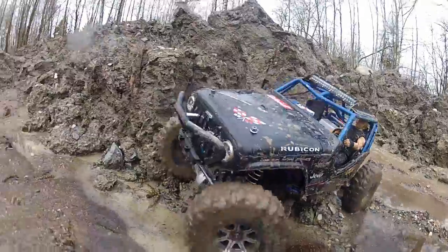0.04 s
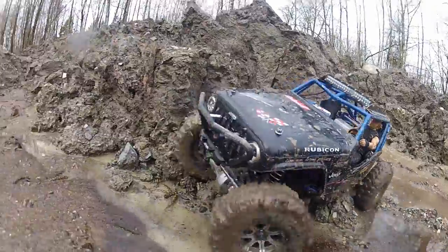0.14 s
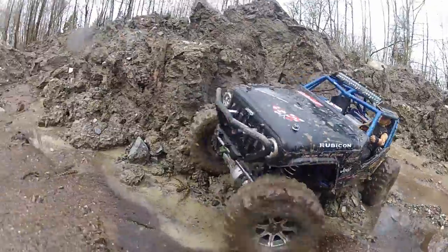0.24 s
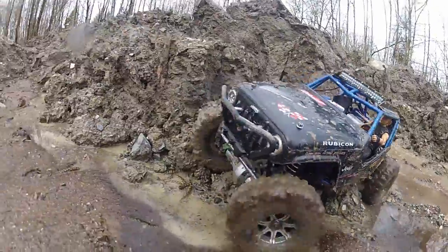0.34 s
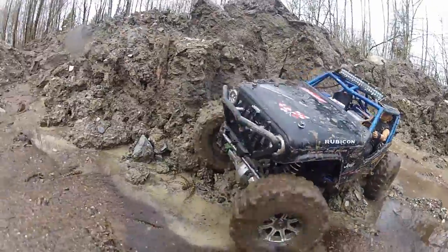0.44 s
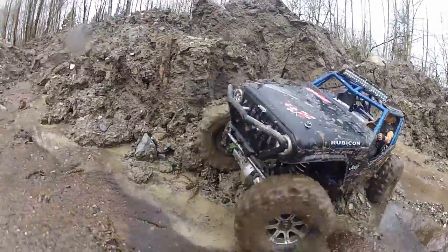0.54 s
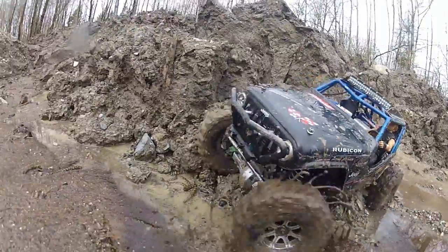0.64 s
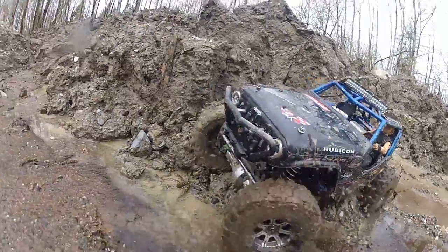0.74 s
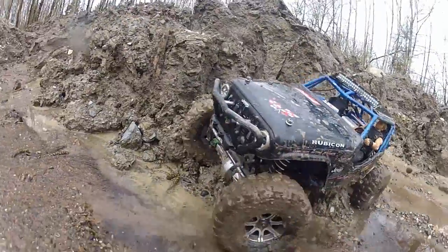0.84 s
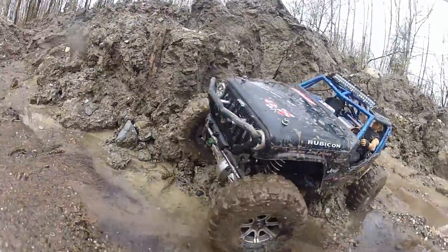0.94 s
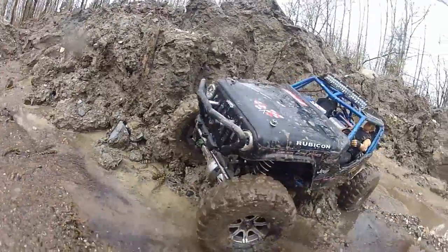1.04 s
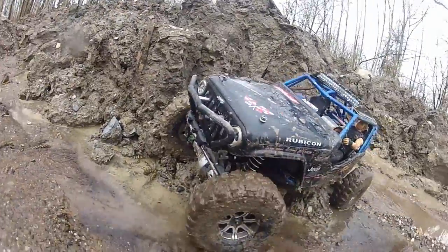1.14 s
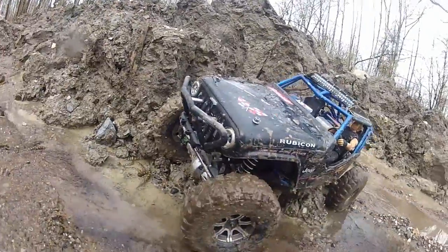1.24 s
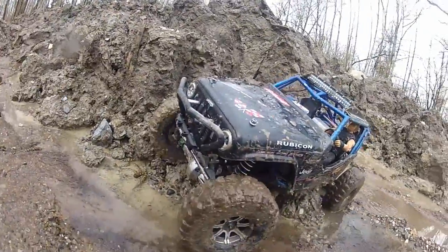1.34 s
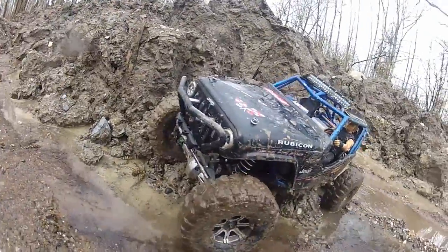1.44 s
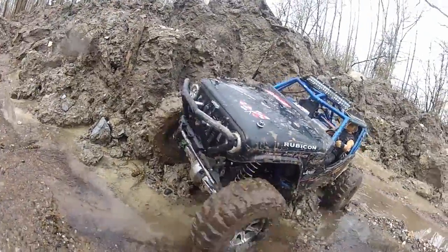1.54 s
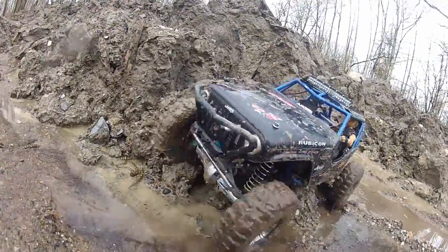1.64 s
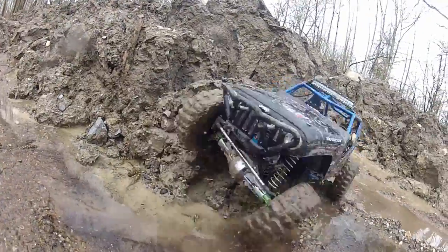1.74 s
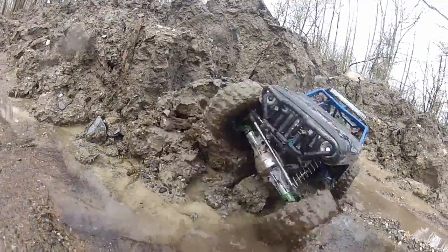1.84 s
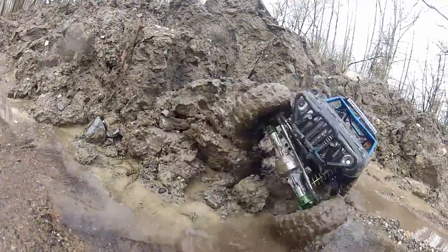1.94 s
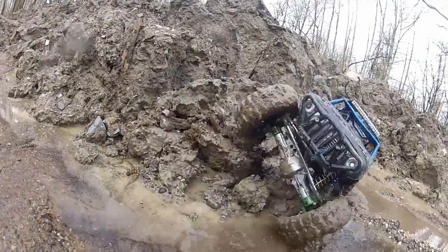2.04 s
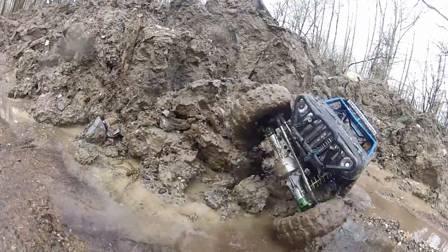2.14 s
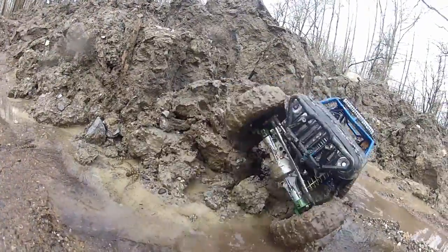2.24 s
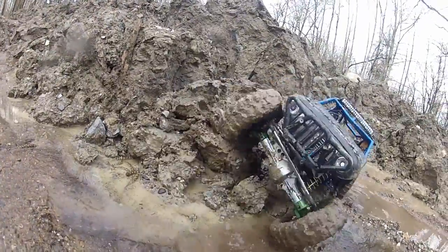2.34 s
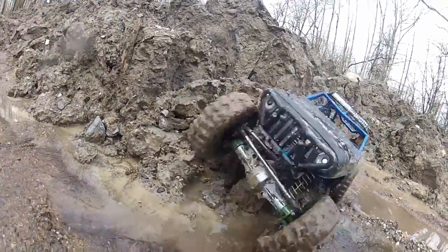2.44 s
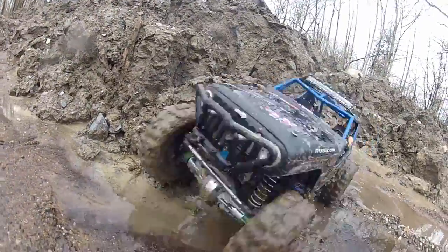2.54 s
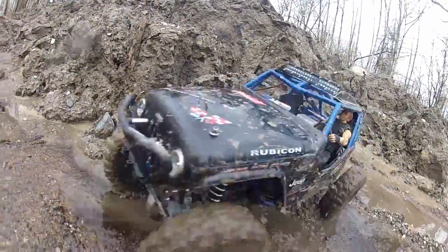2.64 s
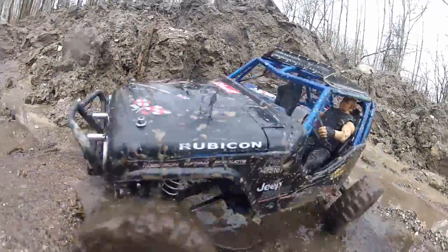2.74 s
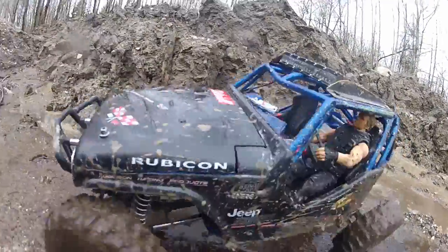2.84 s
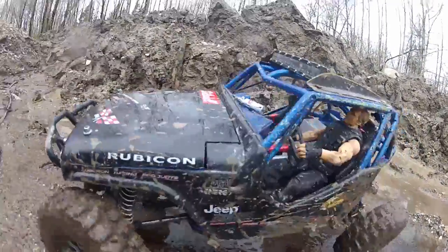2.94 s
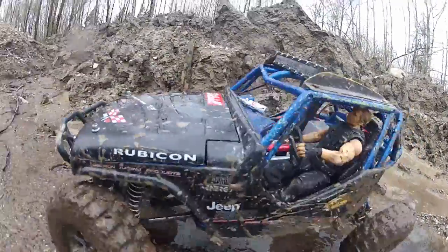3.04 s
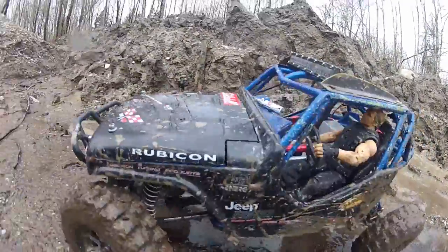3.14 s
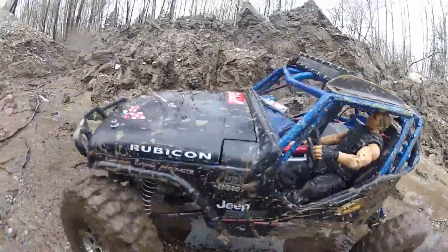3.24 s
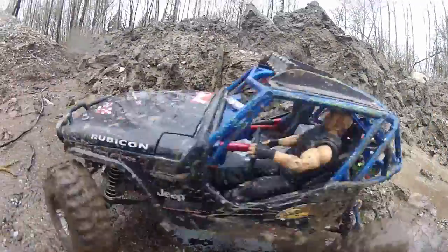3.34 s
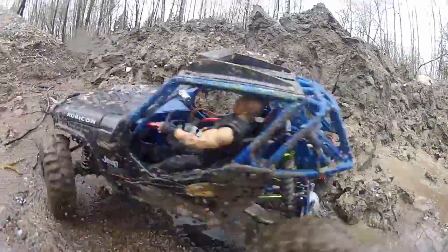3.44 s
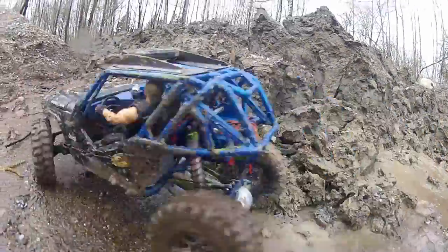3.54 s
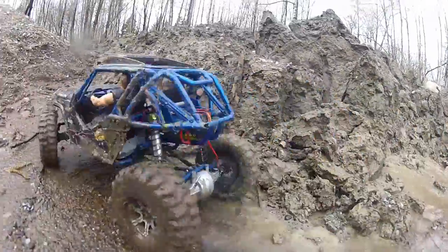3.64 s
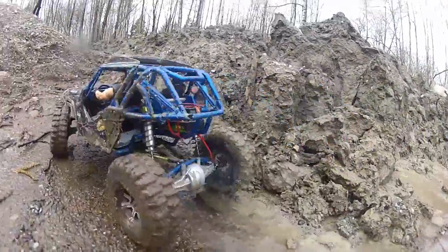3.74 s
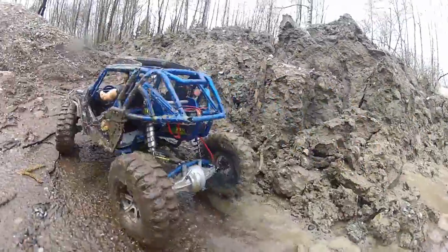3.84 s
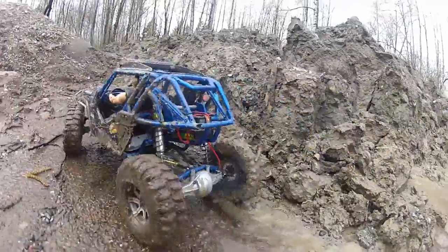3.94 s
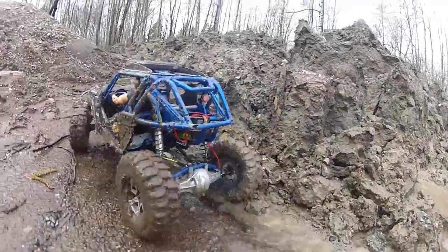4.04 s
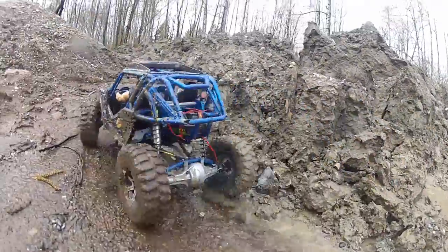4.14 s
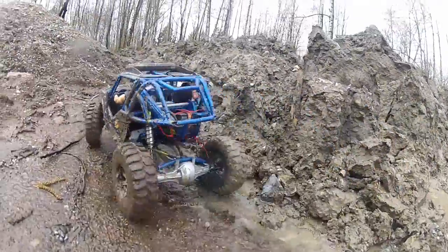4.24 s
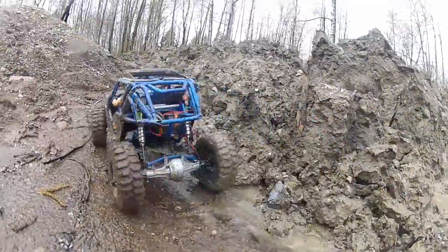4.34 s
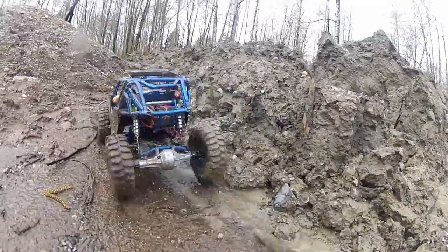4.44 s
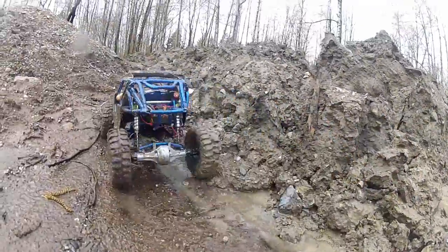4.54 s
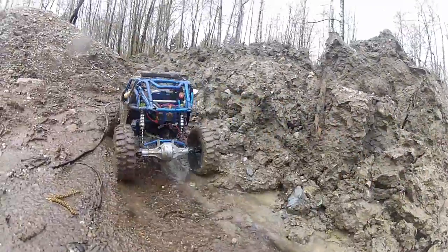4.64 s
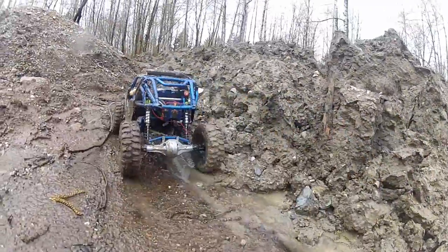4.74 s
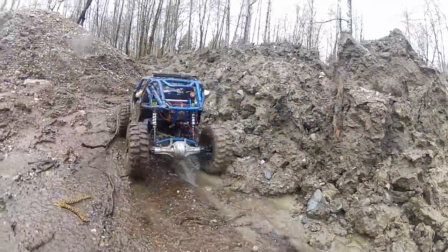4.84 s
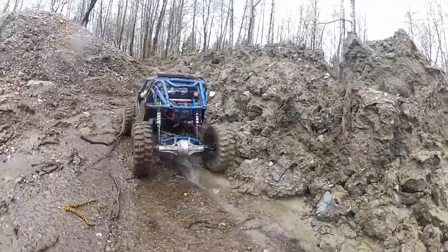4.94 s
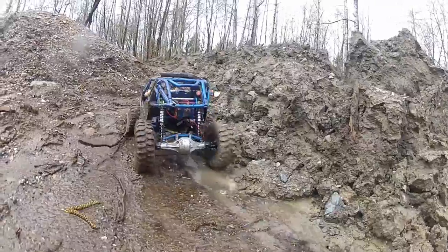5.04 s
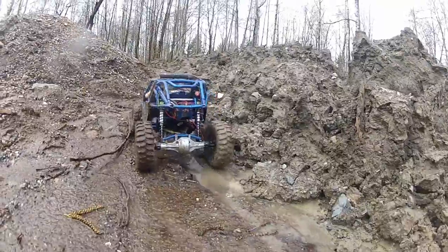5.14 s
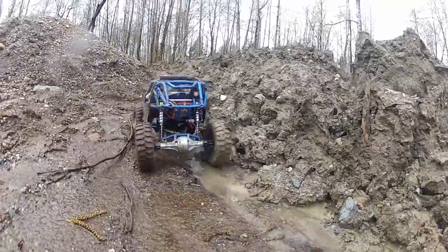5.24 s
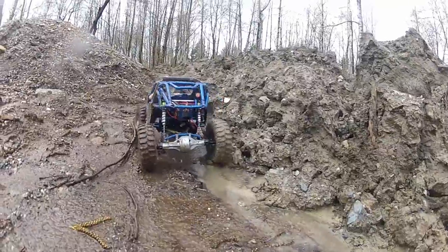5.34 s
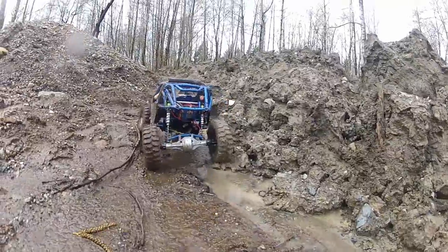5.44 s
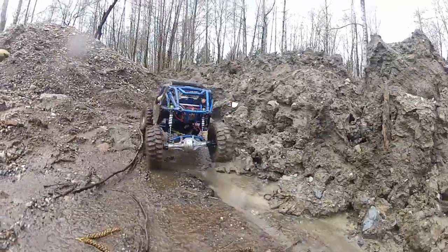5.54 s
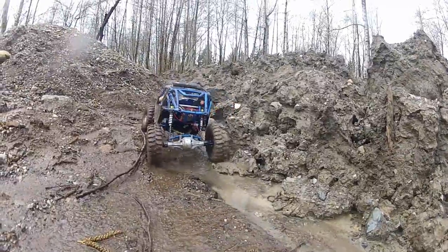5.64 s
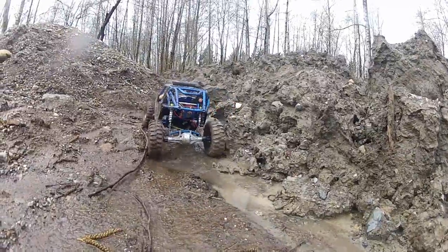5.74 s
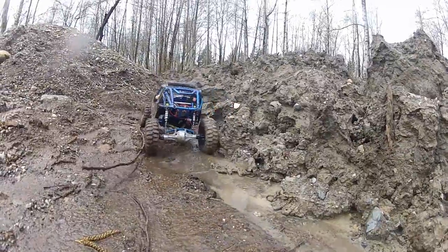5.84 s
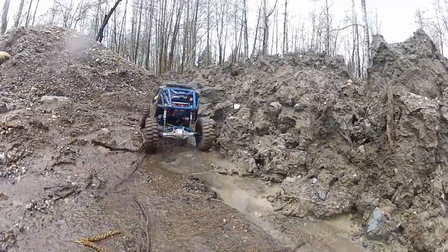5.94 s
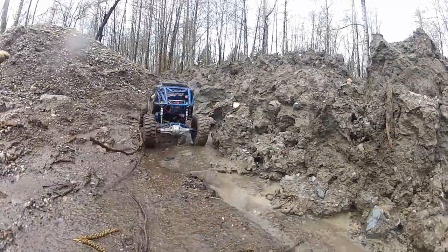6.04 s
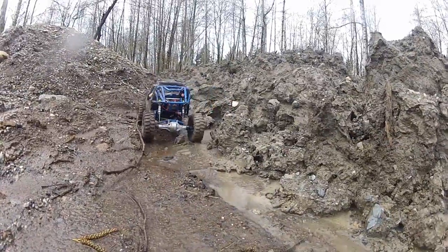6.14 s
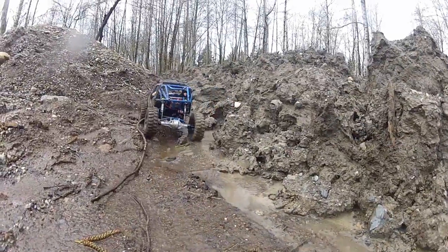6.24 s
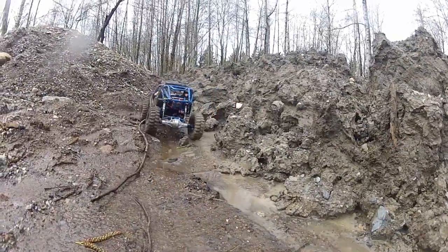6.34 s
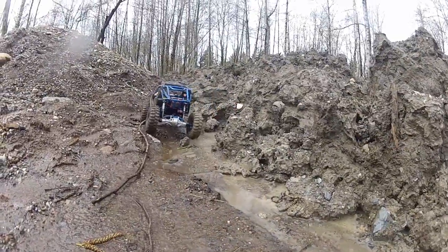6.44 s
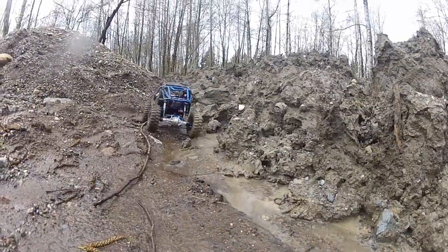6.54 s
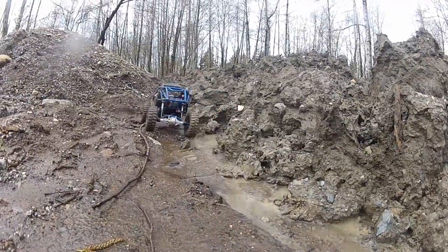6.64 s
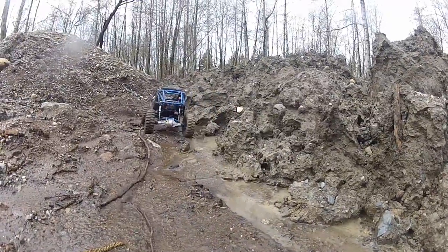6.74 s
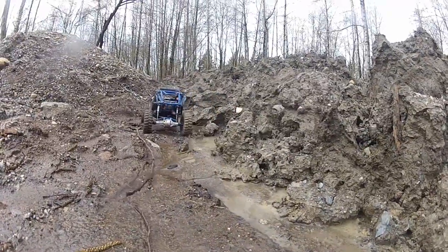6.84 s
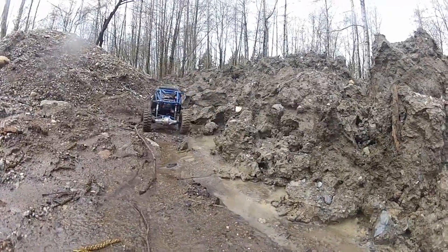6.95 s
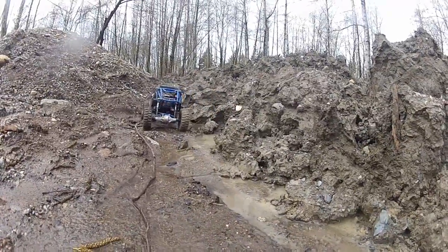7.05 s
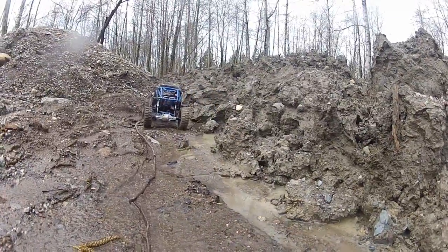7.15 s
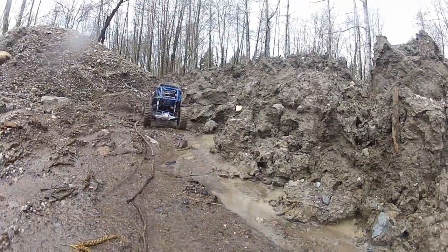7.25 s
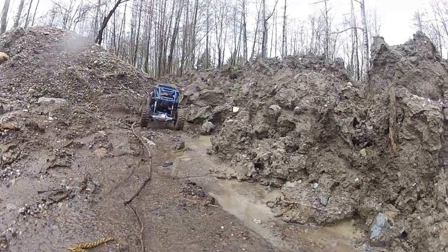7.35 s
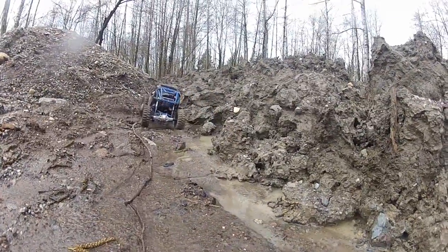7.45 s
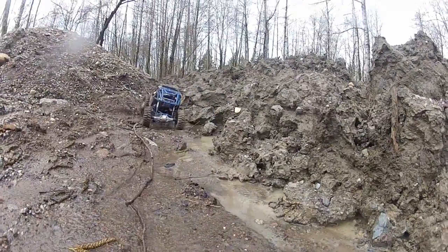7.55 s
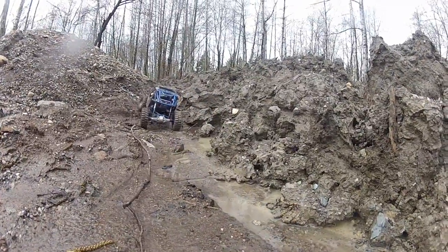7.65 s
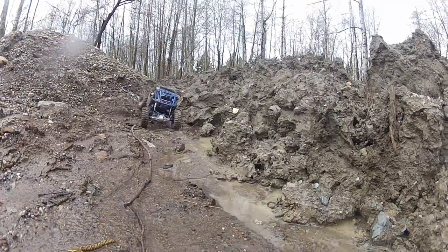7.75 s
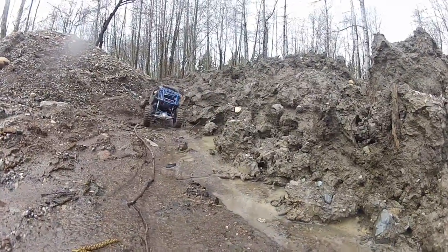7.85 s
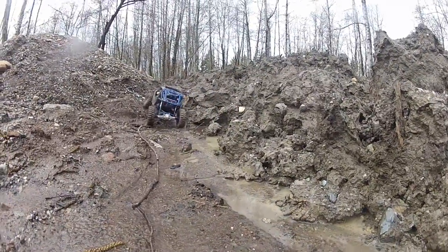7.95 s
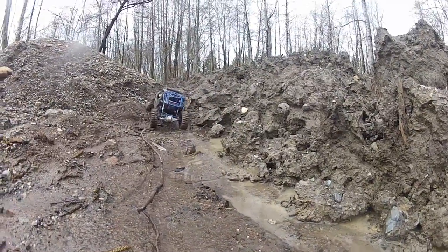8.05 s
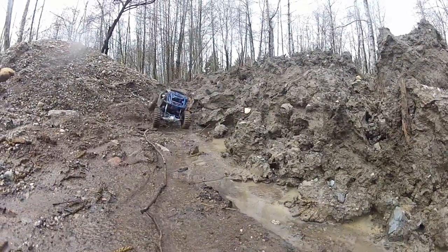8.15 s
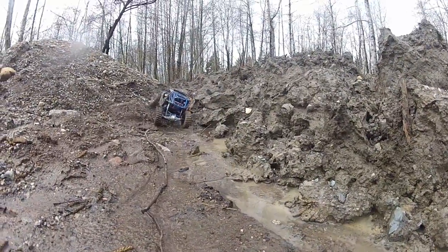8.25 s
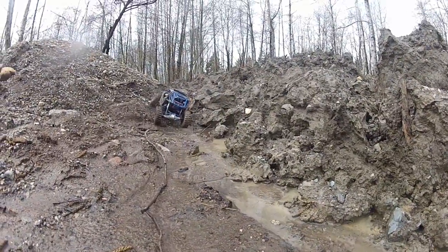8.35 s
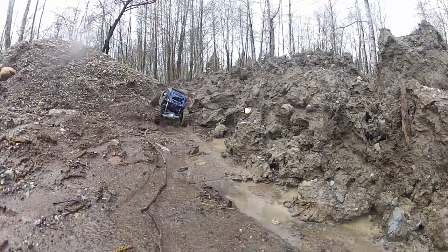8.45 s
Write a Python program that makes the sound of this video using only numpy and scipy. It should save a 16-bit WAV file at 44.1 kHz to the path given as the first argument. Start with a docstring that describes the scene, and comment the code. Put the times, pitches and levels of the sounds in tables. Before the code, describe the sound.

A toy off-road truck revs its electric motor in raspy spurts, knocks once, spatters through wet mud and whirs into the distance.

```python
"""Small gears whine and rasp in bursts as a radio-controlled crawler backs off a mud bank, turns close to a
hand-held camera and drives away through wet ruts. The pitch is the rate at which the teeth mesh; load
roughens it to a rasp. The steering servo ticks, the tyres crackle and fling mud, and far off the motor
warbles. Over a low outdoor rumble, knocks and soft bumps reach the camera's closed housing. Fixed
resonances colour most of the sound."""
import sys
import numpy as np
from scipy import signal
from scipy.fft import rfft, irfft
from scipy.io import wavfile
from scipy.ndimage import uniform_filter1d

SR = 44100
rng = np.random.default_rng(int(sys.argv[2]) if len(sys.argv) > 2 else 0)


def inscribe(sig):
    """Save sig as 16-bit PCM at rate SR to the path in sys.argv[1].

    A 1-D sig is mono; a 2-D sig holds one channel per row.
    Samples are clipped to [-1, 1] before scaling.
    """
    pcm = np.round(np.clip(np.atleast_2d(sig).T, -1, 1) * 32767)
    wavfile.write(sys.argv[1], SR, pcm.astype(np.int16))


N = 373968
TIME = np.arange(N) / SR

# Spectra of tooth rattle, whine from the front and from behind, outdoor air, a knock, loose parts,
# rubbing and spray. Each row: frequency in Hz, relative level in dB.
RATTLE_SPECTRUM = [(300, -15), (600, -2.5), (850, -6), (1300, 2), (2200, 0.5), (3200, -0.5), (3900, -10.5),
                   (4500, -14), (7200, -12.5), (8400, -11), (10300, 0), (14500, -13)]
FRONT_WHINE_SPECTRUM = [(300, -10), (600, -2), (800, 0.5), (1020, -3), (1250, 2.5), (1500, -0.5), (1950, 2),
                        (2300, 1.5), (2600, -12), (2950, -7), (3300, 3), (3800, -4), (4500, -19)]
REAR_WHINE_SPECTRUM = [(300, -20), (600, -3), (800, -5.5), (1020, 1), (1250, -2), (1500, -1), (1950, 0.5),
                       (2300, -9), (2600, -6), (2950, 7), (3300, 7), (3800, 3.5), (4500, -21)]
AIR_SPECTRUM = [(20, -2.5), (45, -1), (100, -4.5), (220, -7.5), (330, -8), (550, -15.5), (900, -20.5),
                (1600, -24), (3000, -31), (5000, -29.5), (10000, -37), (14500, -44)]
KNOCK_SPECTRUM = [(150, -17), (300, -3), (450, -3), (750, -9), (1300, -4.5), (1800, 3.5), (2300, -11),
                  (2900, -4), (3700, -6.5), (4500, -27), (8500, -17.5), (14500, -23)]
CLATTER_SPECTRUM = [(200, 3.5), (800, -22), (1250, 9), (1700, -7), (2350, 0.5), (3000, -14), (3600, -6),
                    (5000, -13), (9500, -14.5), (14500, -14)]
RUB_SPECTRUM = [(40, -5.5), (220, -3.5), (300, -11), (700, -34)]
SPRAY_SPECTRUM = [(1000, -26), (2800, 0.5), (3700, 6.5), (4500, -5), (6000, -11), (8400, 0.5),
                  (10300, -23), (14500, -6)]
# Resonances that colour the sound, with two dips and a deep gap in the treble near 12 kHz.
# Each row: centre in Hz, width in Hz, gain in dB.
PEAKS_AND_DIPS = [(1315, 31, 6.5), (1490, 46, 8.5), (1917, 37, 9), (2350, 490, 5.5), (2882, 293, 11),
                  (3696, 520, 8.5), (6050, 690, -4.5), (7500, 220, -10), (8350, 390, 9.5), (9130, 260, 11),
                  (9780, 600, 5), (11956, 1150, -93), (13800, 180, 10.5)]
# Resonances of the open chassis and the servo. Each row: centre in Hz, width in Hz, gain in dB.
CHASSIS_MODES = [(1210, 110, 1), (1520, 210, 3.2), (1750, 98, 2.2), (1884, 130, 5.3), (2870, 470, 4.6),
                 (3610, 430, 4.2)]
SERVO_MODES = [(2918, 380, 1), (9030, 300, -9.5), (9700, 220, -16)]

# One curve per push of the throttle. Each row: time in seconds, tooth-mesh rate in Hz, load in dB.
THROTTLE_PUSHES = [
    [(-.02, 878, 1), (.07, 830, 3), (.15, 700, 4), (.25, 790, 2.5), (.38, 810, 4), (.42, 790, 5),
     (.48, 1157, 2), (.53, 1120, 5), (.61, 1595, 4.5), (.645, 2297, 1.5), (.72, 2290, 8), (.745, 2830, 12),
     (.84, 2880, 8.5), (.875, 2200, 4), (.94, 599.3, 11.5)],
    [(1.28, 429, 2), (1.65, 694, 6), (1.8, 751, 7), (1.97, 674, 13), (2.04, 394, 7)],
    [(2.39, 798, 12), (2.44, 1488, 8.5), (2.485, 1062, 3), (2.52, 1397, 3.5), (2.565, 1166, 0.5),
     (2.62, 1626, 3), (2.655, 1449, -4.5), (2.665, 2278, -1), (2.688, 2250, -3), (2.705, 1890, 0),
     (2.738, 2198, 4), (2.76, 1783, -1), (2.796, 1791, 8), (2.82, 1152, -5.5), (2.865, 1477, -1),
     (2.9, 1130, -1), (2.98, 580.3, 7), (3.09, 543, 4), (3.18, 326, 18)],
    [(3.19, 281, 0), (3.24, 399.5, 10), (3.31, 801, 7.5), (3.39, 900, 9), (3.45, 1620, 0), (3.49, 1316, 0),
     (3.52, 2062, 0.5), (3.55, 1760, -1), (3.575, 2288, 9.5), (3.605, 1890, -5.5), (3.645, 1902, -4.5),
     (3.68, 1194, 0.5), (3.72, 898, 4.5), (3.755, 1250, -0.5), (3.8, 754, -6.5), (3.96, 713, -1)],
    [(3.89, 720, 0), (4.03, 723, -0.5), (4.22, 753, -3.5), (4.36, 827, 1), (4.63, 821, -3), (4.76, 480, 4),
     (4.88, 589, -3), (5.1, 519, 2), (5.17, 560, -3), (5.33, 513, -4), (5.42, 610, 1), (5.53, 657, -3),
     (5.59, 770, -3), (5.7, 825, -3.5), (5.82, 790, 0.5), (6.1, 779, -1.5), (6.29, 738, 3.5),
     (6.38, 638, -4), (7.05, 652, 2), (7.25, 522, 8), (7.38, 506, -1.5), (7.7, 556, 1.5), (7.93, 558, 1.5),
     (8.02, 681, -0.5), (8.15, 737, 2), (8.33, 690, 2.5), (8.52, 610, 5)],
]
# Surges of speed over ruts. Each row: time in seconds, added mesh rate in Hz, half-length in seconds.
RUT_SURGES = [(4.306, 211.6, 0.04), (4.441, 115.7, 0.029), (4.554, 199.2, 0.023), (5.733, 149.2, 0.03),
              (5.876, 89.4, 0.033), (6.031, 191, 0.032), (6.169, 195, .036), (6.478, 70.5, 0.033),
              (7.6, 70.2, .045), (8.237, 220, 0.044)]
# Gear noise along the route. Each row: time in seconds, base level in dB, treble in dB.
ROUTE = [(0, -52.5, 0.5), (.9, -52.5, -1.5), (1.4, -61, -1.5), (1.7, -50, -2), (2.4, -52, -4),
         (2.7, -49.5, -1.5), (3.1, -55, -3.5), (3.35, -47.5, -3), (3.64, -52, -2), (3.72, -52.5, -2.5),
         (3.92, -58, -1.5), (4, -53, -2.5), (4.25, -53.5, -2.5), (4.62, -53.5, -4), (4.75, -60, -6),
         (4.87, -55.5, -5), (5.4, -56, -2), (5.95, -58, -4), (6.45, -56.5, -3.5), (7, -51.5, -10),
         (7.27, -55.5, -8.5), (7.9, -54, -9.5), (8.2, -58, -7), (8.48, -56.5, -9)]
# Gear partials; fractions belong to other gear pairs. Each row: multiple of mesh rate, level in dB.
GEAR_PARTIALS = [(1, 4.5), (2, 3), (3, 0), (4, -2.5), (5, -8), (1.27, -11), (2.54, -10), (.27, -9),
                 (.5, -14)]
# How the parts of the gear noise follow the drive. Each law: base gain in dB, then dB per octave of
# speed, per dB of load and per dB of treble.
WHINE_LAW = (-6.5, 4.5, -1.1, -0.37)
GROWL_LAW = (-11, -4, 0.9, 2.5)
RASP_LAW = (-9.5, -1, 0.65, 1.02)
HISS_LAW = (-14, -1.1, .5, 0.68)
FIZZ_LAW = (-19, -1.2, 0.2, 0)
SIZZLE_LAW = (-14.5, 2.5, 0.27, .5)
# Sizzle of wet tyres. Each row: high-pass corner in Hz, low-pass corner in Hz, relative level in dB.
SIZZLE_BANDS = [(7260, 9000, -11), (8800, 6700, -20), (9800, 12000, -10)]
# Extra tyre hiss, strongest from behind. Each row: time in seconds, gain in dB.
TYRE_HISS = [(3.7, 1), (4.5, 4), (5, 1), (5.7, 4.5), (6.2, 0), (7, 0.5)]
# Low rumble, which also scales the light bumps. Each row: time in seconds, gain in dB.
RUMBLE_GAIN = [(0, 9), (.8, 4.5), (1.1, 0.5), (2.3, .5), (2.8, 4.5), (3.7, 3.5), (4.2, 1.5), (5.2, -0.5),
               (6, 1.5), (6.5, 4.5), (7.2, 0), (8.48, 2.5)]
# Spells of straining. Each row: start and end in seconds, relative servo buzz in dB, motor whirr in dB
# relative to the gear level.
STRAIN_SPELLS = [(-.05, 0.572, -65, -13.5), (0.562, 0.954, -54.5, -10), (1.585, 2.023, -57, -0.5),
                 (2.374, 2.985, -53.5, -6), (3.254, 3.697, -53.5, -6.5)]
# Steering corrections. Each row: time in seconds, relative level in dB.
SERVO_TWITCHES = [(.955, -51), (1.042, -59), (1.107, -59), (1.172, -55), (1.234, -58.5), (1.322, -70),
                  (1.385, -55), (1.429, -58), (1.466, -52), (1.52, -52), (1.565, -49), (3.119, -59),
                  (3.169, -53.5)]
# Soft bumps on the camera. Each row: time in seconds, relative peak in dB, frequency in Hz.
GRIP_BUMPS = [(.091, -38.5, 47), (0.118, -46, 109), (0.146, -41.5, 40.2), (0.204, -36.5, 75.5),
              (0.266, -42, 123), (.496, -35.5, 74.6), (0.594, -37.5, 40), (0.655, -41.5, 218),
              (.704, -37.5, 78), (0.818, -40.5, 73), (2.89, -43, 54), (3.169, -44, 48.4), (5.46, -47.5, 48),
              (5.828, -46, 40.1), (6.254, -37, 65), (6.314, -41, 57.2), (6.54, -41.5, 104.9),
              (6.695, -42, 60), (6.75, -43, 45.9), (6.804, -33.5, 69), (6.905, -42.5, 55.6),
              (6.62, -45.5, 90), (7.37, -45.5, 50.3), (7.749, -41.5, 81.7), (8.025, -37, 122)]
# Scrapes of loose parts. Each row: start in seconds, level in dB, length in seconds.
LOOSE_SCRAPES = [(0.541, -41.5, 0.056), (0.573, -47, 0.022), (6.769, -53, 0.0091), (6.826, -48, 0.012),
                 (6.845, -33.5, 0.023), (6.863, -37.5, 0.022), (6.883, -53.5, 0.018)]
# Hard contacts. Each row: start in seconds, peak in dB, decay in seconds, thud in dB relative to peak.
HARD_KNOCKS = [(0.5714, -9.5, 0.0021, -7.5), (6.8546, -22, 0.0017, -23)]
# Gearbox squeals. Each row: start in seconds, level in dB, frequency in Hz, length in seconds.
GEAR_SQUEALS = [(0.64, -29, 2333, 0.0053), (0.6605, -34, 2180, 0.0091), (0.71, -33.5, 2290, 0.011),
                (0.74, -37.5, 3700, 0.01), (0.774, -38, 3580, 0.013), (0.8, -41, 3720, 0.0089),
                (0.817, -38, 3540, 0.013), (.832, -34.5, 3600, 0.012), (0.87, -28, 2190, 0.0087),
                (2.661, -25.5, 2270, 0.0071), (2.6676, -28.5, 2340, 0.012), (2.707, -31, 1940, 0.0081),
                (2.7205, -28, 2300, 0.0044), (2.74, -30, 2360, 0.0067), (2.806, -36, 1380, 0.01),
                (3.4635, -38, 1506, 0.026), (3.566, -29.5, 2330, 0.0076), (3.577, -30.5, 2230, 0.0096)]
# Gobs of muddy water. Each row: time of peak in seconds, level in dB, rise and fall in seconds.
MUD_SPLASHES = [(.82, -42, 0.13, 0.064), (2.78, -55, 0.043, 0.063), (3.62, -45, 0.13, 0.043),
                (3.78, -53.5, 0.051, 0.055), (4.32, -53.5, 0.032, 0.023), (4.449, -54.5, 0.021, 0.027),
                (4.56, -59, 0.027, 0.049), (5.7, -83, 0.14, 0.2), (8.02, -64.5, .02, 0.056),
                (8.13, -64, 0.032, 0.042)]
# Pebbles flicked against the chassis. Each row: start in seconds, peak in dB.
PEBBLE_HITS = [(1.24, -53), (2.741, -29.5), (2.776, -35), (2.852, -36), (3.124, -57), (3.171, -55),
               (3.75, -50), (3.785, -47), (3.861, -45.5), (6.77, -45), (6.822, -40)]
# Spells of faint, irregular high chirping. Each row: start and end in seconds, relative level in dB.
HIGH_CHIRP_SPELLS = [(1.27, 1.651, -69), (2.903, 3.33, -63.5), (3.8, 4.499, -64.5), (4.5, 5.198, -69),
                     (5.205, 6.301, -67.5)]
# Tone of the distant motor. Each row: time in seconds, level in dB.
WARBLE_LEVEL = [(5.9, -89), (6.35, -61), (7, -60.5), (7.3, -70), (7.7, -70), (8.1, -71), (8.45, -64.5)]

CRUISE_HZ = 800  # reference mesh rate
TURN_S = (3.64, 4.1)  # the truck turns its back


def undb(db):
    """Decibels to amplitude ratio."""
    return 10 ** (np.asarray(db) / 20)


def unit(x):
    """Normalisation to rms 1."""
    return x / np.sqrt(np.mean(x ** 2))


def running_rms(x, size=3000):
    """Envelope by a moving average of power."""
    return np.sqrt(np.abs(uniform_filter1d(x ** 2, size)) + 1e-12)


def add(out, start, x):
    """Superposition of a short sound at a time in seconds."""
    i = max(int(start * SR), 0)
    out[i:i + len(x)] += x[:N - i]


def curve(rows):
    """Linear interpolation of rows (time, values); one signal per value column."""
    times, *columns = np.transpose(rows)
    return [np.interp(TIME, times, column) for column in columns]


def held(start, end, rise=0.037, fall=0.054):
    """Trapezoidal envelope: attack, hold, release; times in seconds."""
    return np.clip(np.minimum((TIME - start) / rise, (end - TIME) / fall), 0, 1)


def swell(peak_s, rise, fall):
    """Gaussian envelope with separate widths before and after its peak."""
    return np.exp(-np.minimum(((TIME - peak_s) / np.where(TIME < peak_s, rise, fall)) ** 2, 20))


def wander(rate):
    """Random modulation: ramps between new values drawn rate times a second; rms 1."""
    step = max(int(SR / rate), 2)
    levels = np.repeat(rng.standard_normal(N // step + 1), step)
    return unit(uniform_filter1d(levels, step)[:N])


def grains(rate, spread_db):
    """Poisson clicks of uneven size; rms 1."""
    clicks = (rng.random(N) < rate / SR) * rng.standard_normal(N)
    return unit(clicks * undb(spread_db * np.minimum(rng.exponential(size=N), 4)))


def spatter(rate, decay):
    """Shot noise: random jolts that decay exponentially; mean 1."""
    jolts = (rng.random(N) < rate / SR) * rng.uniform(0.69, 1, N)
    envelope = signal.lfilter([1], [1, -np.exp(-1 / (decay * SR))], jolts)
    return envelope / envelope.mean()


def pulses(rate, length, spread_db):
    """Pulse train with jitter in timing and size; rms 1."""
    out, hump = np.zeros(N), np.hanning(int(length * SR))
    for k, (late, size) in enumerate(rng.uniform(-1.24, 1, (int(rate * N / SR) - 1, 2))):
        add(out, (k + late / 4) / rate, undb(spread_db * size) * hump)
    return unit(out)


def resonance(hz, width_hz):
    """A randomly driven resonator gives narrow-band noise."""
    phase = 2 * np.pi * hz * TIME
    return unit(wander(width_hz) * np.cos(phase) + wander(width_hz) * np.sin(phase))


def band(x, lo_hz, hi_hz):
    """Zero-phase band-pass with soft skirts."""
    f = np.arange(len(x) // 2 + 1) * SR / len(x) + 1e-3
    return irfft(rfft(x) / (1 + (lo_hz / f) ** 10) / (1 + (f / hi_hz) ** 10), len(x))


def colour(x, spectrum, ring=1, modes=PEAKS_AND_DIPS, size=2048):
    """Minimum-phase filter: a broad spectrum plus peaks and dips, their dB gains scaled by ring."""
    f = np.maximum(np.arange(size // 2 + 1) * SR / size, 1)
    hz, db = np.transpose(spectrum)
    broad_db = np.interp(np.log(f), np.log(hz), db)
    modes_db = sum(gain * 2 ** -(2 * (f - centre) / width) ** 2 for centre, width, gain in modes)
    cepstrum = irfft(np.log(undb(broad_db + ring * modes_db)))
    cepstrum[1:size // 2] *= 2  # folding the cepstrum makes the response causal
    cepstrum[size // 2 + 1:] = 0
    return signal.fftconvolve(x, irfft(np.exp(rfft(cepstrum))))[:len(x)]


def drive(db_per_octave=8.5, db_per_load=-0.61, stopped_db=-75.5):
    """Mesh rate, load, level and treble of the gears: level grows with speed and falls with load."""
    hz, load_db = curve(sorted(row for push in THROTTLE_PUSHES for row in push))
    surge_hz = sum(added * swell(s, length, length) for s, added, length in RUT_SURGES)
    hz, load_db = hz + surge_hz, load_db + 0.0044 * surge_hz
    pushes = [held(push[0][0], push[-1][0], rise=0.0082, fall=0.037) for push in THROTTLE_PUSHES]
    running = np.max(pushes, axis=0)
    base_db, treble_db = curve(ROUTE)
    level_db = base_db + db_per_octave * np.log2(hz / CRUISE_HZ) + db_per_load * load_db
    return hz, load_db, running * level_db + (1 - running) * stopped_db, treble_db


def gears(mesh_hz, load_db, teeth=13, wobble=.024, stutter=.55, smear=.54, grind_db=2.2):
    """Periodic tooth contact whines and rattles; backlash modulates each partial's size and phase."""
    catching = .03 * np.clip(load_db / 5, 0, 1) * wander(35)  # a loaded motor catches and frees itself
    hz = mesh_hz * (1 + wobble * wander(70) + catching)
    phase = 2 * np.pi * np.cumsum(hz) / SR
    shaft = np.sin(phase / teeth + 1.1 * wander(150))
    pressure = 1 + 0.048 * shaft  # the teeth rattle harder once a shaft turn
    backlash = np.clip(hz / 1100, .75, 1.2)
    whine = 0
    for multiple, db in GEAR_PARTIALS:
        rolloff = 1 + (multiple * hz / 4400) ** 8  # the gearbox passes little above its resonances
        size = undb(db + grind_db * wander(22)) / rolloff * (1 + stutter * wander(110))
        jitter = smear * backlash * np.sqrt(multiple) * (wander(330) + .6 * shaft)
        whine = whine + size * np.sin(multiple * phase + jitter)
    rattle = pressure * (rng.standard_normal(N) + 0.47 * grains(rate=2500, spread_db=2))
    grab = .65 + .35 * spatter(rate=150, decay=.006)  # the tyres grab and let go
    jolts = 1 + 0.18 * spatter(rate=70, decay=0.0092)
    return unit(whine * grab * (1 + 0.23 * pressure)), unit(rattle * jolts)


def truck(hz, load_db, level_db, treble_db, flicker_db=2.2):
    """Radiation of gears and wet grit: the spectrum depends on speed, load, direction and distance."""
    def gain(law):
        """Power law in speed, load and treble."""
        base_db, per_octave, per_load, per_treble = law
        speed_db = per_octave * np.log2(hz / CRUISE_HZ)
        return undb(base_db + speed_db + per_load * load_db + per_treble * treble_db)
    whine, rattle = gears(hz, load_db)
    grit = undb(-13) * grains(rate=83, spread_db=-1.5)
    thinning = np.interp(TIME, [6.2, 7.3], [0, 1])  # with distance the whine thins from below
    whine = gain(WHINE_LAW) * (whine + thinning * (band(whine, 1200, 2400) * undb(2) - whine))
    behind = np.interp(TIME, TURN_S, [0, 1])
    front = colour((1 - behind) * whine, FRONT_WHINE_SPECTRUM, ring=0.97)
    rear = colour(behind * whine, REAR_WHINE_SPECTRUM, modes=CHASSIS_MODES)
    sound = front + rear + colour(rattle + grit, RATTLE_SPECTRUM)
    core = band(sound, 900, 2600)
    dulling = np.interp(TIME, [3.7, 6.4], [0, .75])  # far off, its upper edge is lost
    core = core - dulling * (core - band(core, 500, 2200))
    parts = [(core, undb(-2)),
             (band(sound, 350, 900), gain(GROWL_LAW)),
             (band(sound, 2600, 4300), gain(RASP_LAW)),
             (band(sound, 4300, 7200), gain(HISS_LAW) * undb(curve(TYRE_HISS)[0])),
             (band(sound, 12500, 15000), gain(FIZZ_LAW) * undb(flicker_db * wander(25)))]
    for lo, hi, db in SIZZLE_BANDS:
        parts.append((band(sound, lo, hi), gain(SIZZLE_LAW) * undb(db + flicker_db * wander(25))))
    balanced = sum(part / running_rms(part) * size for part, size in parts)
    return balanced * undb(level_db + 0.89 * wander(40))


def air(level_db=-61):
    """Broadband outdoor noise: a slowly modulated rumble under a faint hiss."""
    noise = unit(colour(rng.standard_normal(N), AIR_SPECTRUM, ring=0.14))
    low = band(noise, 33, 285)
    rumble = low * undb(curve(RUMBLE_GAIN)[0] + 2.34 * wander(14))
    return undb(level_db) * (noise - low + rumble)


def servo(twitch_s=0.015):
    """Pulsed resonances: the servo ticks rapidly under load and singly in steering corrections."""
    strain = sum(undb(db - 1) * held(start, end) for start, end, db, _ in STRAIN_SPELLS)
    buzz = strain * (.2 + .85 * pulses(rate=54, length=.015, spread_db=3))
    twitches = np.zeros(N)
    hump = np.sin(np.pi * TIME[:int(twitch_s * SR)] / twitch_s)
    for start, db in SERVO_TWITCHES:
        add(twitches, start - .002, undb(db - 8.5) * hump)
    ring = sum(undb(db) * resonance(hz, width) for hz, width, db in SERVO_MODES)
    rattle = undb(-8) * unit(colour(rng.standard_normal(N), RATTLE_SPECTRUM))
    return (twitches + buzz) * ring + twitches * rattle


def motor_whirr(gear_db, free_db=-20):
    """Forced resonance: a whirr that follows the gear level and swells as the motor labours."""
    strain = sum(undb(db) * held(start, end) for start, end, _, db in STRAIN_SPELLS)
    return (undb(free_db) + strain) * undb(gear_db) * resonance(2290, 240)


def bumps(decay_cycles=0.69, rub_s=0.0085, light_count=18, light_db=-51.5, light_hz=72):
    """Heavily damped oscillation: the shifting grip thumps the camera, with a little dull rubbing."""
    thumps, rubs, t = np.zeros(N), np.zeros(N), TIME[:SR // 5]
    restless_db = curve(RUMBLE_GAIN)[0]
    light = [(when * N / SR, light_db + restless_db[int(when * N)], light_hz * 2 ** (2 * pitch - 1))
             for when, pitch in rng.random((light_count, 2))]
    for start, db, hz in GRIP_BUMPS + light:
        thump = np.sin(2 * np.pi * hz * t) * t * np.exp(-2 * t * hz / decay_cycles)
        add(thumps, start - .003, undb(db - 1) * thump / np.abs(thump).max())
        add(rubs, start - .008, undb(db - 11) * (t / rub_s) * np.exp(1 - t / rub_s))
    friction = band(colour(rng.standard_normal(N), RUB_SPECTRUM), 29, 650)
    return thumps + rubs * unit(friction)


def scrapes(rise_s=0.00089):
    """Dense tiny impacts of loose parts merge into bursts of clatter."""
    envelope, t = np.zeros(N), TIME[:SR // 8]
    for start, db, length in LOOSE_SCRAPES:
        add(envelope, start, undb(db) * (1 - np.exp(-t / rise_s)) * np.exp(-(t / length) ** 2.9))
    chatter = grains(rate=7000, spread_db=1)
    return envelope * unit(colour(chatter, CLATTER_SPECTRUM, ring=0.92))


def knocks(thud_hz=172, thud_decay_s=0.0068, thud_lag_s=0.00085):
    """Impulse response: a hard contact cracks, then rocks the housing in a damped thud."""
    out, t = np.zeros(N), TIME[:SR // 8]
    thud = np.sin(2 * np.pi * thud_hz * t) * np.exp(-t / thud_decay_s) * (1 - np.exp(-t / 0.00034))
    for start, db, decay, thud_db in HARD_KNOCKS:
        contact = 0.36 * rng.standard_normal(len(t)) * np.exp(-t / decay)
        contact[0] -= 1  # the impulse itself
        crack = colour(contact, KNOCK_SPECTRUM, ring=0.38)
        add(out, start, undb(db) * crack / np.abs(crack).max())
        add(out, start + thud_lag_s, undb(db + thud_db) * thud)
    return out


def squeals(rise_s=0.00057, scratch_db=-12):
    """Resonance: the teeth hit a gearbox mode, which rings briefly with a scratch of tooth noise."""
    ring, envelope, t = np.zeros(N), np.zeros(N), TIME[:SR // 20]
    for start, db, hz, length in GEAR_SQUEALS:
        burst = undb(db) * (1 - np.exp(-t / rise_s)) * np.exp(-(t / length) ** 4)
        add(ring, start, burst * np.sin(2 * np.pi * hz * t))
        add(envelope, start, burst)
    scratch = unit(colour(rng.standard_normal(N), RATTLE_SPECTRUM))
    return ring + undb(scratch_db) * envelope * scratch


def spray():
    """Superposed impacts of tiny drops make each gob of mud from the tyres fizz."""
    envelope = sum(undb(db) * swell(s, rise, fall) for s, db, rise, fall in MUD_SPLASHES)
    drops = grains(rate=2500, spread_db=1) * (.5 + spatter(rate=66, decay=0.0094))
    return envelope * unit(colour(drops, SPRAY_SPECTRUM))


def pebbles(decay_s=0.0016):
    """A brief impact has a broad spectrum: each pebble gives one dry tick."""
    out, t = np.zeros(N), TIME[:SR // 30]
    for start, db in PEBBLE_HITS:
        tick = colour(rng.standard_normal(len(t)) * np.exp(-t / decay_s), RATTLE_SPECTRUM)
        add(out, start, undb(db) * tick / np.abs(tick).max())
    return out


def high_chirps():
    """Amplitude modulation: narrow-band noise near 6 kHz flickers in faint, irregular chirps."""
    spells = sum(undb(db - 8) * held(start, end) for start, end, db in HIGH_CHIRP_SPELLS)
    return spells * pulses(rate=39, length=.032, spread_db=4) * resonance(6020, 700)


def distant_motor(centre_hz=2017, swing=.028, throb_db=3):
    """Frequency and amplitude modulation: the motor's unbroken tone warbles over the bumps."""
    hz = centre_hz * (1 + swing * (wander(16) + wander(120)))
    size = undb(curve(WARBLE_LEVEL)[0] + throb_db * wander(30))
    return size * np.sin(2 * np.pi * np.cumsum(hz) / SR)


def scene():
    """Mid-side stereo, nearly mono: the mud bank diffusely reflects the sharp sounds and the spray."""
    sharp = squeals() + knocks() + scrapes() + pebbles()
    mud = spray()
    t = TIME[:SR // 12]
    bank = rng.standard_normal(len(t)) * np.exp(-t / 0.011)
    reflection = signal.fftconvolve(band(sharp + mud, 250, 15000), bank / np.linalg.norm(bank))[:N]
    side = undb(-19) * reflection - undb(-28) * sharp  # sharp sounds sit a little to the right
    hz, load_db, level_db, treble_db = drive()
    mid = truck(hz, load_db, level_db, treble_db) + distant_motor() + servo() + high_chirps()
    mid += motor_whirr(level_db) + mud + sharp + bumps() + air()
    return np.array([mid + side, mid - side])


def record(dry):
    """Band limiting: the camera's steep low-pass cuts the treble above 14.6 kHz."""
    return signal.sosfilt(signal.ellip(10, .2, 80, 14600, fs=SR, output="sos"), dry)


dry = scene()
out = record(dry)
inscribe(out)
```